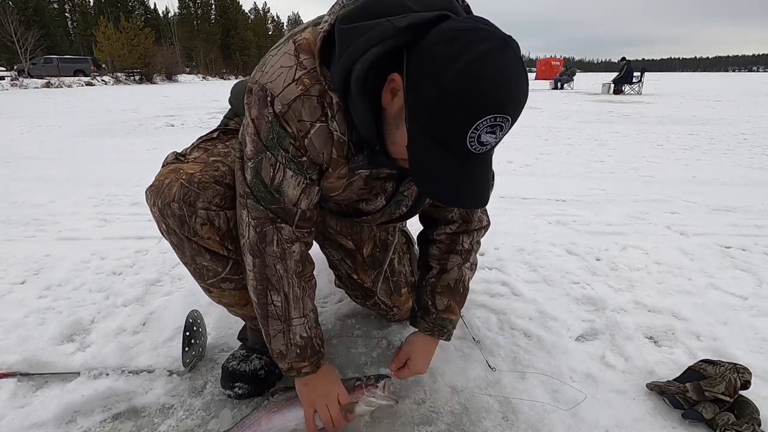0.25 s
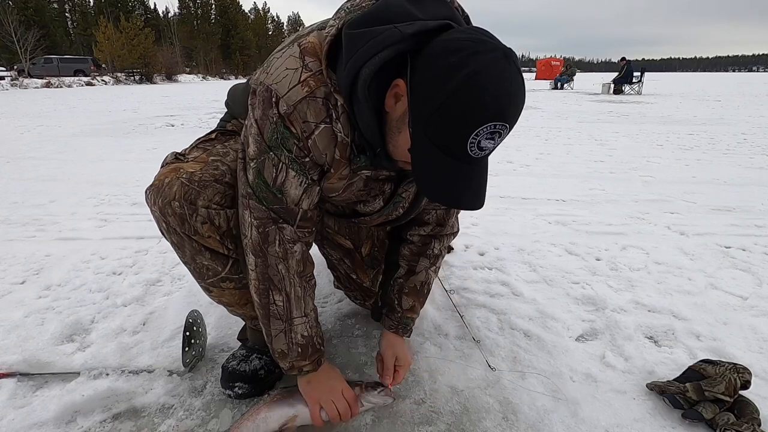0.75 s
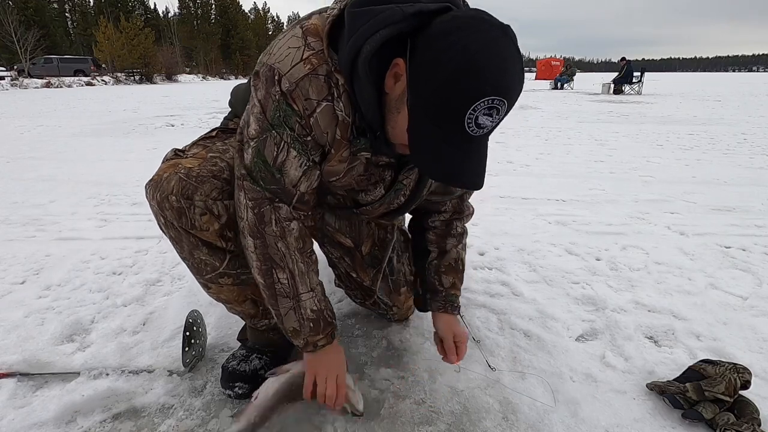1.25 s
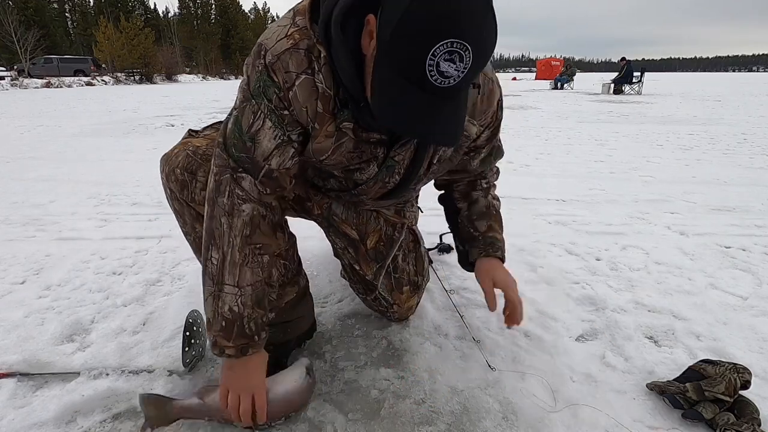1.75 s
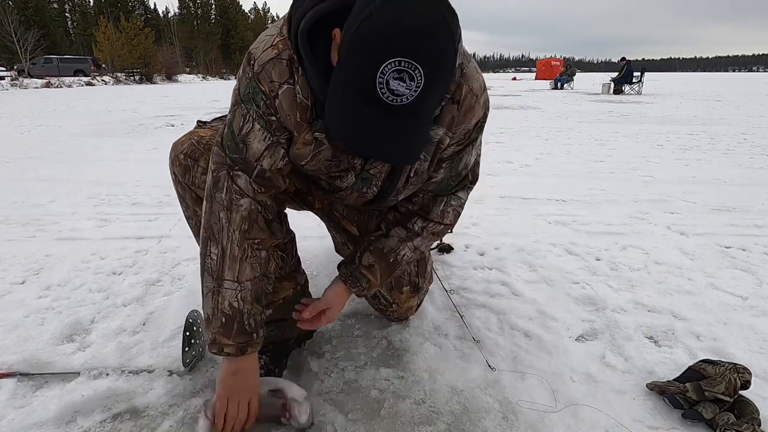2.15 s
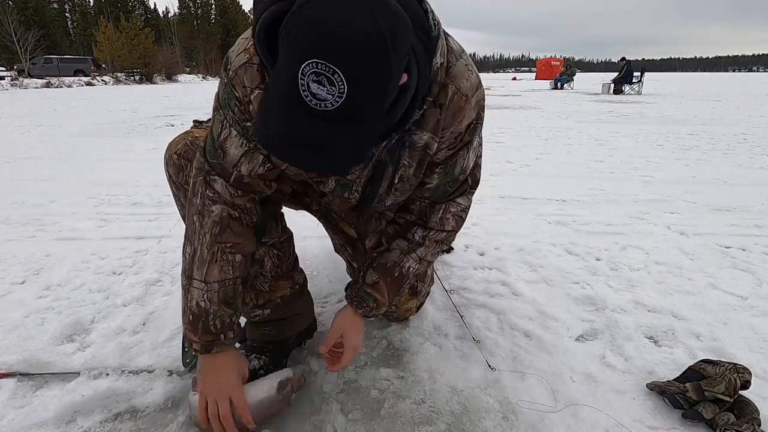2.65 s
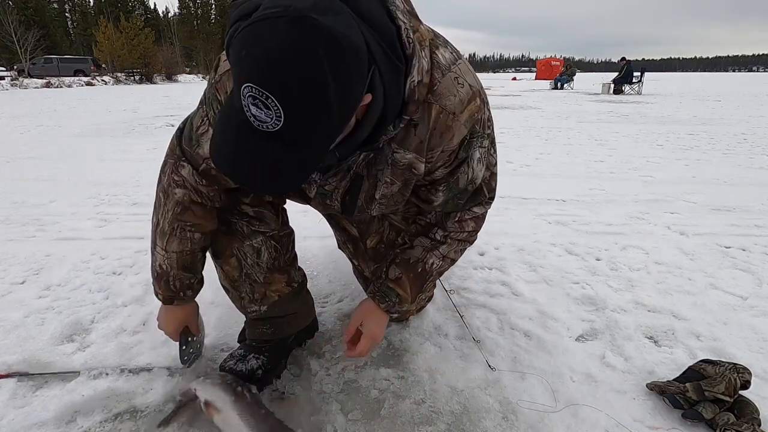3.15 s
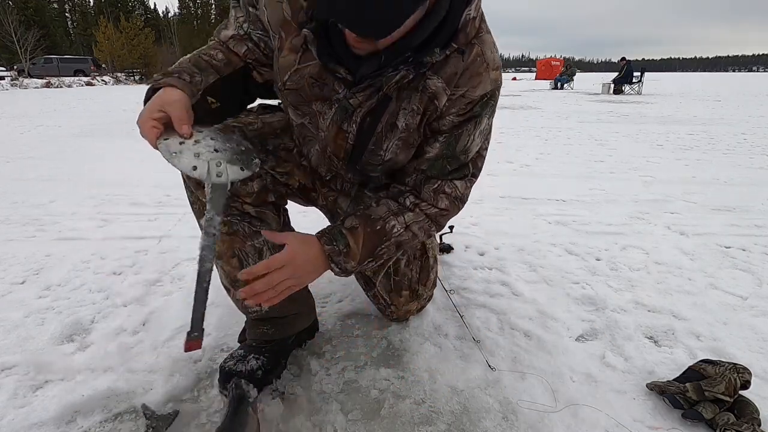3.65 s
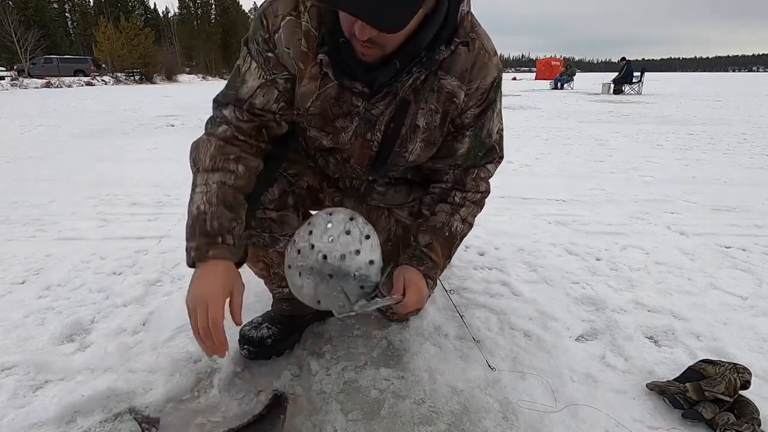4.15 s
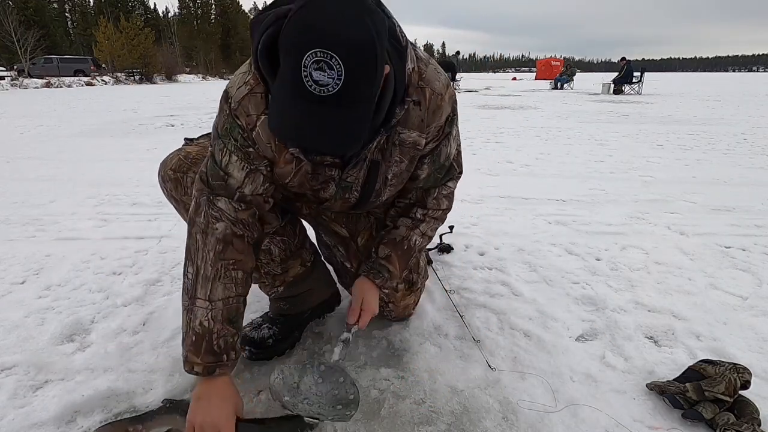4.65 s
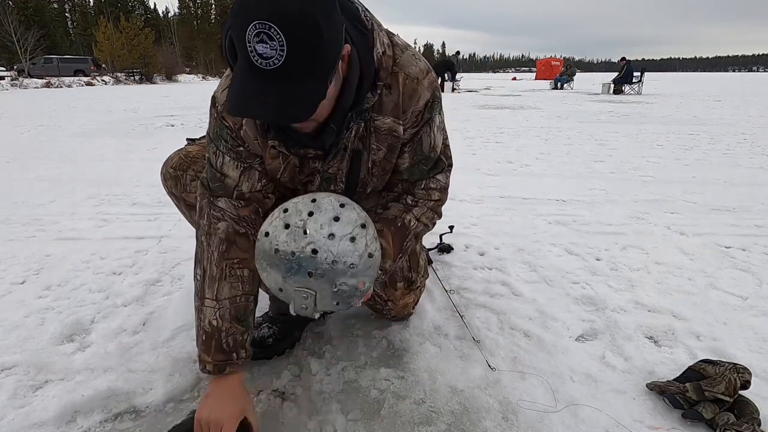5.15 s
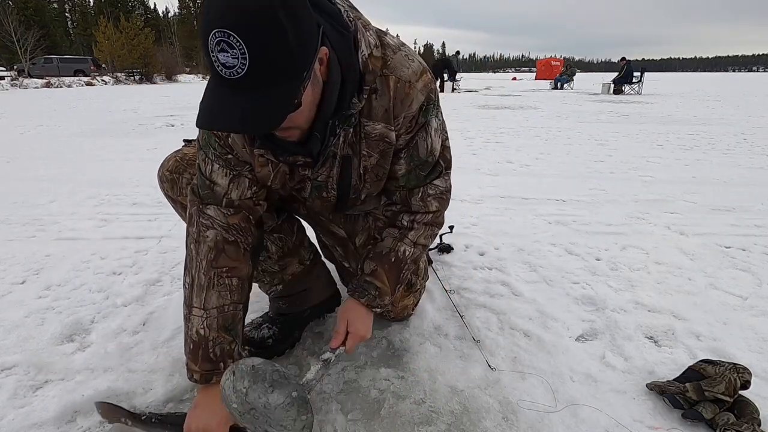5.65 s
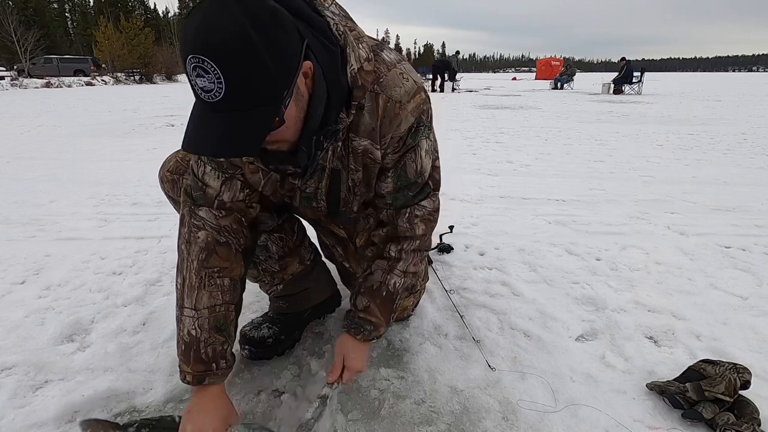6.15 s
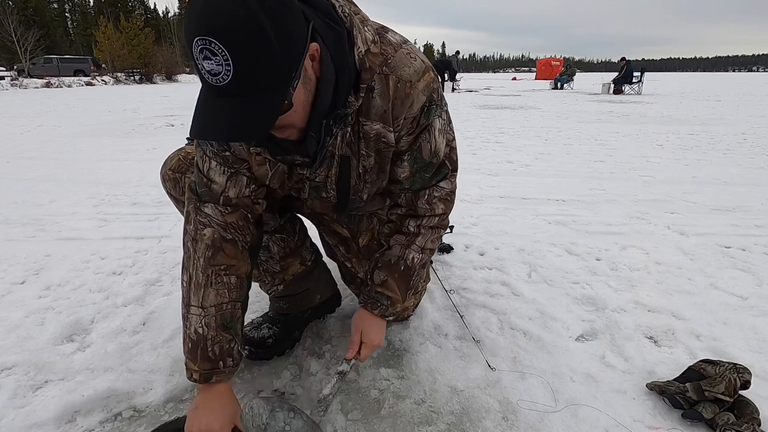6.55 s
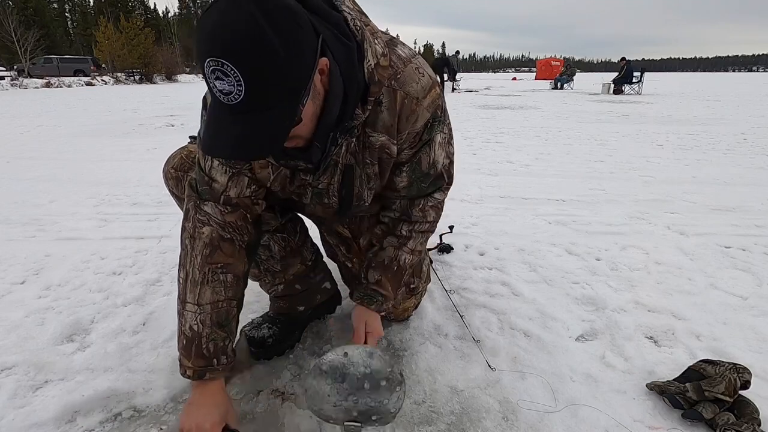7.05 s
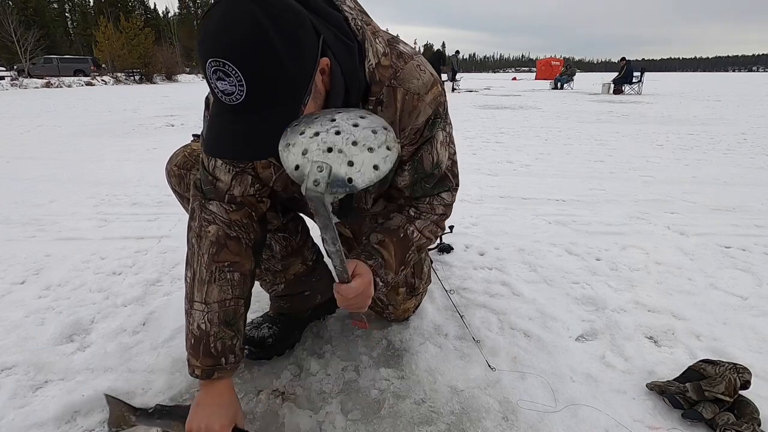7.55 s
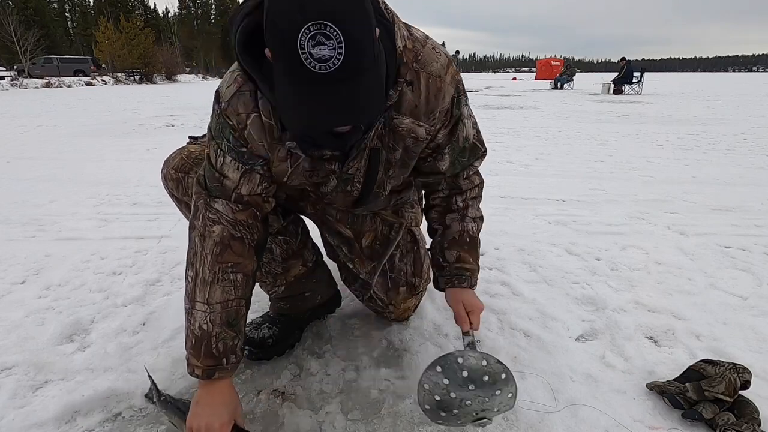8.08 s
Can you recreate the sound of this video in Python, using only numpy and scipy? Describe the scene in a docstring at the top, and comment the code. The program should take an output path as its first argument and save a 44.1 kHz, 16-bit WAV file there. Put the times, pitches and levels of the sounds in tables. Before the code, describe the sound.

Ice fishing heard from very near: cloth rustles, wet snow crunches, air pockets pop and crumbs of ice crack irregularly. After about six seconds of sliding and scuffing, a perforated metal scoop strikes slush three times, its dull clank dying almost at once, with crackle, thump and stirring between blows. Outdoors, no echo beyond a slap off the ice, and only faint air behind.

```python
"""Ice fishing, heard close up: a fish, hands and stiff sleeves slide over wet, grainy snow as shaped grain noise,
while air pockets pop as short rings, crumbs of ice snap as filtered bursts and soft thuds push as damped sines.
Then a perforated metal skimmer scrapes the slush and chops into it three times, each a damped modal ring that
the ice returns, with cracks and spray, led in by a soft rush of air and followed by churning slush.
Faint air of the open lake, a coloured noise, lies under it throughout."""
import sys
import numpy as np
from scipy import signal
from scipy.fft import rfft, irfft, next_fast_len
from scipy.io import wavfile
from scipy.ndimage import uniform_filter1d, map_coordinates

SR = 44100
rng = np.random.default_rng(int(sys.argv[2]) if len(sys.argv) > 2 else 0)


def wav_out(sig):
    """Save sig, one row per channel (or a flat mono array), as 16-bit PCM at SR to the path in sys.argv[1]."""
    wavfile.write(sys.argv[1], SR, np.round(np.clip(np.atleast_2d(sig).T, -1, 1) * 32767).astype(np.int16))


N = 366912  # length in samples

# long strokes: drags over snow, a pull through slush, sleeves rustling as the skimmer lifts and swings:
# start_s, length_s, rasp_db, swell_db (start to end), hiss_db (relative to the rasp)
STROKES = [(0.114, 0.12, -43, 6.5, -6.5), (1.283, 0.43, -39.5, -8.5, -2.5), (1.746, 0.17, -63, -11, 10.5),
           (1.898, 0.17, -46.5, 3.5, -4), (2.251, 0.11, -35.5, -2.5, -1.5), (2.38, 0.17, -42.5, 2.5, 0),
           (2.544, 0.21, -44, -2, -1.5), (2.837, 0.16, -55, 4.5, 4.5), (2.63, 0.09, -33.5, 2, -3),
           (2.924, 0.23, -43.5, -1.5, -1), (3.184, 0.29, -40, -5, -3.5), (3.524, 0.048, -44, 13, 0),
           (4.56, 0.54, -47, -5.5, -1.5), (4.885, 0.2, -37.5, 1.5, -3), (5.083, 0.097, -40.5, -7.5, -3.5),
           (5.28, 0.255, -52.5, 7, -2), (5.552, 0.14, -61.5, 8.5, 1.5), (6.453, 0.15, -38.5, -5, 0),
           (6.798, .2, -47, 0.5, -3.5), (7.357, 0.13, -51, 5.5, -0.5), (7.621, 0.17, -47.5, -0.5, -4)]
STROKE_ATTACK_S, STROKE_T60_S, STROKE_CRUMBS = 0.035, 0.15, .33  # crumbs: share 0-1
# quick scuffs: start_s, rasp_db, hiss_db (relative to the rasp)
SCUFFS = [(0.647, -43, -6.5), (0.804, -30.5, -8), (1.32, -38, -5), (1.436, -37, 1), (2.188, -45, -16),
          (2.757, -37.5, -6.5), (3.208, -33, -6.5), (3.308, -37, -13), (3.557, -32.5, -5.5),
          (3.66, -43.5, -3.5), (3.911, -37.5, 1.5), (3.984, -45.5, -0.5), (4.725, -41, -3), (5.76, -77, 18),
          (6.643, -51.5, 2.5), (6.895, -46.5, -0.5), (7.375, -49, 2.5)]
SCUFF_ATTACK_S, SCUFF_LENGTH_S, SCUFF_T60_S, SCUFF_CRUMBS = 0.019, 0.029, 0.12, 0.32
# wet handling: fingers on the fish, then slush pressed or stirred:
# start_s, length_s, rasp_db, swell_db, hiss_db (relative to the rasp), crumbs (share 0-1), gurgle_db
WET_HANDLING = [(0.39, 0.23, -60.5, 4, -10, 1, -96), (0.94, 0.17, -53, -4, -5, 0.8, -99),
                (1.143, 0.065, -30.5, 0, -9, 0.25, -64), (1.193, 0.062, -32, -3, -6, 0, -49.5),
                (4.054, 0.073, -39.5, 24.5, -15, 0.67, -52.5), (4.125, 0.062, -26.8, 3, -12, 0.12, -42),
                (4.836, 0.044, -38.5, 11, -4.5, .2, -54), (6.291, 0.047, -35.5, -3, -6.5, 0.7, -44),
                (6.346, 0.06, -39.5, 1, -1.5, 0.66, -42.5), (6.4, 0.04, -41, -5, -1.5, 0.5, -39.5),
                (7.064, 0.18, -49, 6, -2.5, 0.8, -53.5)]
WET_ATTACK_S, WET_T60_S = 0.023, 0.15
# stiff clothing never quite stops rustling: time_s, rasp_db
RUSTLE = [(0, -53.5), (.28, -50), (.36, -68.5), (.58, -66), (.64, -60), (.87, -48.5), (.905, -60),
          (1.3, -52), (2.17, -53.5), (3.6, -47), (3.88, -56), (4.26, -51), (4.42, -57), (5.66, -55),
          (5.73, -72), (5.84, -60.5), (6.06, -75), (6.3, -58)]
RUSTLE_HISS_DB, RUSTLE_CRUMBS = -4.5, 0.53  # hiss relative to the rasp at the usual level; share 0-1
RUSTLE_USUAL_DB, RUSTLE_BRIGHTENS = -51.5, 0.37  # usual level; dB more hiss for each dB above it
# weave of a moving sleeve: level relative to the rasp, pitch at full force, noise width, rise with force
ZIP_DB, ZIP_HZ, ZIP_WIDTH_HZ, ZIP_HZ_PER_DB = -10, 2850, 480, 25

# skimmer blows: start_s, clack_db, repeat_db (reflection off the ice, relative to the clack),
# thump_db, thump_hz, spray_db, crack_db, focus_hz (strongest ring)
CHOPS = [(6.2130, -10.5, -9.5, -14.5, 131, -28, -20, 1060), (7.014, -12, -1, -24, 180, -27, -21, 1520),
         (7.7684, -10, -10, -15, 177, -53, -22, 1550)]
REFLECTION_LAG_S = .0042  # direct ring to reflection
# ring modes of the scoop, damped by slush: pitch_hz, level_db, t60_s
SCOOP_MODES = [(390, -14.5, 0.055), (690, -7, 0.022), (963, 3, 0.013), (1260, -1.5, .025),
               (1480, 10, 0.0069), (1923, 0.2, 0.019), (2262, -2.5, 0.03), (3140, -11, .018),
               (3960, -2, 0.011)]
STIR_DB, STIR_GURGLE_DB, STIR_T60_S = -59.5, -56.5, 0.3  # slush settling after each blow: rasp, gurgle, decay
CRACKLE_DB, CRACKLE_HZ = -3, 1700  # fine wet crackle, relative to the crumbs of wet handling

# snapping crumbs and small taps: start_s, level_db, pitch_hz
SNAPS = [(0.718, -23, 1720), (0.723, -17, 1900), (0.918, -26, 3500), (1.643, -22.5, 3500),
         (2.2722, -14.5, 2340), (2.351, -16, 3040), (3.286, -19, 1600), (4.138, -14, 2000),
         (4.158, -14, 2400), (4.32, -29, 7650), (5.3582, -22, 3710), (6.3127, -16, 1690),
         (6.329, -19, 2200), (6.4726, -14, 4700)]
# small patches of snow crust that give way: middle_s, level_db, pitch_hz
CRUNCHES = [(0.385, -49, 4570), (2.11, -42, 2600), (2.791, -32, 3600), (3.764, -36.5, 2920),
            (3.841, -45, 3200), (5.3, -47, 3500), (6.733, -51, 3500), (7.313, -39.5, 3000),
            (8.1, -47, 3000)]
CRUNCH_WIDTH_S = .006  # from the middle of the swell to 1/e
# wet pops of bursting air pockets: start_s, level_db, pitch_hz
BLIPS = [(0.4, -37, 1150), (0.518, -30, 1150), (0.531, -38, 1100), (0.62, -36, 1250), (0.949, -30, 1600),
         (0.978, -30, 1530), (1.002, -30, 1500), (1.017, -33, 1450), (1.077, -35, 1700), (1.091, -33, 1690),
         (1.141, -30, 1380), (6.355, -22, 1500), (7.106, -33, 1350), (7.121, -30, 1720), (7.144, -31, 1200),
         (7.166, -32, 1500), (7.185, -28.5, 1450), (7.2, -35, 1550)]
# soft thuds on packed snow and slush: start_s, push_db, pitch_hz, knock_db
THUDS = [(1.573, -31, 160, -35.5), (1.645, -41, 139, -33), (2.788, -41, 151, -46), (3.065, -56, 151, -69),
         (3.838, -46.5, 251, -72), (4.074, -37, 140, -55), (4.228, -43, 94, -41), (6.314, -32, 258, -50),
         (6.353, -33, 290, -36), (6.414, -32.5, 188, -35.5), (6.489, -38, 250, -54),
         (7.105, -37.5, 264, -60), (7.239, -36.5, 192, -70)]
KNOCK_HZ = 472  # the hard crust under the snow answers each thud
SWING_DB, SWING_RISE_DB_PER_S = -52.5, 178  # rush of air at the moment of landing, and its climb

# tone of dragged snow, relative: pitch_hz, level_db (per Hz)
RASP_SPECTRUM = [(40, -50.5), (160, -23), (400, -14), (780, -14), (1200, -4.5), (1900, -1), (2900, 0),
                 (4200, -2.5), (6000, -13.5), (15000, -43)]
# tone of fine wet grains, relative: pitch_hz, level_db (per Hz)
HISS_SPECTRUM = [(1000, -45.5), (2500, -3.5), (4300, 2), (5400, 1), (6500, -3), (7700, -1), (8600, -4),
                 (12500, -12), (14000, -17), (15500, -55.5)]
# tone of coarse breaking crumbs, relative: pitch_hz, level_db (per Hz)
CRUMB_SPECTRUM = [(100, -48), (800, -16.5), (1100, -1.5), (1400, 0), (2900, 5), (4300, -4), (8000, -17.5),
                  (14000, -31)]
# tone of gurgling slush, relative: pitch_hz, level_db (per Hz)
CHURN_SPECTRUM = [(20, -19), (55, -3), (85, -9), (160, 4.5), (280, 0), (420, 0), (650, -7), (1200, -5),
                  (4000, -44)]
# tone of cracking crust and spray, relative: pitch_hz, level_db (per Hz)
CRACK_SPECTRUM = [(100, -2), (500, -18.5), (1000, -8), (2000, -1.5), (4000, -1), (10000, -17),
                  (15000, -27.5)]
# tone of the open air, relative: pitch_hz, level_db (per Hz)
AIR_SPECTRUM = [(20, -11.5), (105, -11), (155, 6), (300, -1.5), (700, -3), (1200, -2.5), (8000, -14),
                (15000, -30)]

# stereo width, as gain on the side signal: pitch_hz, side_db
WIDTH = [(100, -12), (600, -10), (1200, -14.5), (2000, -25.5), (3600, -16), (5000, -9.5), (7300, -5.5),
         (11000, -9)]
# balance between the ears: pitch_hz, left_minus_right_db
LEAN = [(1000, -1.9), (1800, -1), (3900, 0.6), (7300, -7), (9500, -1)]
# phase between the microphones: pitch_hz, left_lead_rad
PORT_PHASE = [(4000, -0.022), (6300, -0.6), (7500, 0.18), (8600, 1), (10000, -0.6)]
HOLE_LAG_S = .00002  # sounds from the hole reach the left microphone this much later
TOP_HZ = 15000


def sliding():
    """Countless snow grains rasp and hiss; coarser crumbs break in clumps among them."""
    rasp_db, hiss_db, share = friction()
    catch_db = 0.19 * wobble(42) + wobble(220)  # the surface catches and lets go
    breaks = clumps(rate=69, decay_s=0.015)
    coarse = grains(rate=4500, top_hz=13600, t60=0.0026, spread_db=0)
    crumbs = coloured(coarse * breaks, CRUMB_SPECTRUM)
    rasp = np.sqrt(1 - share) * coloured(noise(), RASP_SPECTRUM) + np.sqrt(share) * crumbs
    rasp = patchy(rasp, depth_db=2.3)
    # heavy, wet dragging has little hiss and a deeper crunch
    deep = filtered(rasp, lambda hz: 1 / (1 + (hz / 2000) ** 4))
    rasp = rasp + deep * (amp(-.4 * (hiss_db + 4)) - 1)
    fine = grains(rate=5000, top_hz=13600, t60=0.0048, spread_db=1)
    hiss = coloured(noise() + np.sqrt(share) * breaks * fine, HISS_SPECTRUM)
    hiss = patchy(hiss, depth_db=1.8)
    return amp(rasp_db + catch_db - 1.5) * rasp + amp(rasp_db + hiss_db + catch_db + 0.73) * hiss


def friction():
    """All movements add their power; gives rasp dB, hiss dB relative to it, and the share of crumbs."""
    rustle_db, = curves(RUSTLE)
    power = friction_power(0, RUSTLE_HISS_DB, RUSTLE_CRUMBS) * amp(rustle_db) ** 2
    power[1] *= amp(RUSTLE_BRIGHTENS * (rustle_db - RUSTLE_USUAL_DB)) ** 2
    for s, length_s, db, swell_db, hiss_db in STROKES:
        shape = stroke(length_s, STROKE_ATTACK_S, STROKE_T60_S, swell_db)
        add(power, s, friction_power(db, hiss_db, STROKE_CRUMBS) * shape)
    for s, db, hiss_db in SCUFFS:
        shape = stroke(SCUFF_LENGTH_S, SCUFF_ATTACK_S, SCUFF_T60_S)
        add(power, s, friction_power(db, hiss_db, SCUFF_CRUMBS) * shape)
    for s, length_s, db, swell_db, hiss_db, crumbs, _ in WET_HANDLING:
        shape = stroke(length_s, WET_ATTACK_S, WET_T60_S, swell_db)
        add(power, s, friction_power(db, hiss_db, crumbs) * shape)
    for s, *_ in CHOPS:
        shape = stroke(0.12, WET_ATTACK_S, STIR_T60_S)
        add(power, s, friction_power(STIR_DB, hiss_db=0, crumbs=0.79) * shape)
    rasp, hiss, crumbs = power
    return 10 * np.log10(rasp), 10 * np.log10(hiss / rasp), np.clip(crumbs / rasp, 0, 1)


def friction_power(db, hiss_db, crumbs):
    """Power rows of one movement: rasp, hiss, crumbs."""
    return amp(db) ** 2 * np.array([[1], [amp(hiss_db) ** 2], [np.clip(crumbs, 0, 1)]])


def stroke(length_s, attack_s, t60, swell_db=0):
    """Power over one movement: it gathers speed, presses harder or eases off, then comes to rest."""
    t = np.arange(int((length_s + t60) * SR)) / SR
    pressure = amp(swell_db * (np.minimum(t / length_s, 1) - .5))
    rest = fade(np.maximum(t - length_s, 0), t60)
    return (np.minimum(t / attack_s, 1) * pressure * rest) ** 2


def zipping():
    """The weave of a moving sleeve hisses in a narrow band that climbs as the stroke gets harder."""
    power = np.zeros((1, N))
    for s, length_s, db, swell_db, _ in STROKES:
        add(power, s, amp(db) ** 2 * stroke(length_s, STROKE_ATTACK_S, STROKE_T60_S, swell_db))
    force_db = 10 * np.log10(power[0] / power.max() + 1e-6)
    pitch_hz = ZIP_HZ + ZIP_HZ_PER_DB * force_db + ZIP_WIDTH_HZ / 2 * wobble(20)
    weave = filtered(noise(), lambda hz: 1 / (1 + (hz / ZIP_WIDTH_HZ) ** 2))
    carrier = np.cos(2 * np.pi * np.cumsum(pitch_hz) / SR)
    return amp(ZIP_DB) * np.sqrt(power) * unit(weave * carrier)


def chops():
    """The skimmer rings and cracks the crust; the ice returns each ring about 4 ms later; slush thumps and sprays."""
    out, t = np.zeros((2, N)), np.arange(SR // 5) / SR
    for s, clack_db, repeat_db, thump_db, thump_hz, spray_db, crack_db, focus_hz in CHOPS:
        ring = scoop(t, focus_hz) + amp(repeat_db) * scoop(t - REFLECTION_LAG_S, focus_hz)
        crack_shape = np.minimum(t / .001, 1) * fade(np.maximum(t - REFLECTION_LAG_S, 0), .027)
        crack = coloured(noise(len(t)), CRACK_SPECTRUM) * crack_shape
        spray = coloured(noise(len(t)), CRACK_SPECTRUM) * fade(t - .007, 0.19)
        push = thump(t - .0055, thump_hz, cycles=3.2) + 0.67 * thump(t - .0055, 1.8 * thump_hz, cycles=4.2)
        slosh = 0.065 * coloured(noise(len(t)), CHURN_SPECTRUM) * fade(t - .003, 0.19)
        add(out, s, ahead(amp(clack_db) * ring))
        add(out, s, amp(crack_db) * crack)
        add(out, s, amp(thump_db) * (ahead(push) + slosh))
        add(out, s, amp(spray_db) * spray)
        # the scoop touches loose slush just before it lands
        touch = unit(filtered(noise(len(t)), lambda hz: band(880)(hz) ** 2)) * fade(t, 0.05)
        add(out, s - .0105, amp(clack_db - 24) * touch)
    return out


def scoop(t, focus_hz):
    """The contact point favours modes near focus_hz; slush chokes the ring in a few hundredths of a second."""
    ring = 0
    for k, (hz, db, t60) in enumerate(SCOOP_MODES):
        favour_db = 6 * np.exp(-(np.log(hz / focus_hz) / 0.125) ** 2)
        mode = np.sin(2 * np.pi * hz * t) * fade(t, t60)
        ring = ring + (-1) ** k * amp(db + favour_db) * mode
    return ring * (1 - np.exp(-np.maximum(t, 0) / .0016))  # soft onset


def churning():
    """Air pockets gurgle and wet grains tumble, lump by lump, in wet handling and in slush just struck."""
    power = np.zeros((1, N))
    for s, length_s, *_, gurgle_db in WET_HANDLING:
        add(power, s, amp(gurgle_db) ** 2 * stroke(length_s, WET_ATTACK_S, WET_T60_S))
    for s, *_ in CHOPS:
        add(power, s, amp(STIR_GURGLE_DB) ** 2 * stroke(.018, WET_ATTACK_S, STIR_T60_S))
    lumps = clumps(rate=260, decay_s=0.007)
    bubbles = grains(rate=880, top_hz=1870, t60=0.02, spread_db=0)
    pockets = coloured((bubbles + 1.6 * noise()) * lumps, CHURN_SPECTRUM)
    return np.sqrt(power) * pockets * [[1], [.4]]  # mid, side


def crackling():
    """Tiny wet pops burst one after another while fingers handle the fish or slush is pressed or stirred."""
    power = np.zeros((1, N))
    for s, length_s, db, _, _, crumbs, _ in WET_HANDLING:
        shape = stroke(length_s, WET_ATTACK_S, WET_T60_S)
        add(power, s, np.clip(crumbs, 0, 1) * amp(db) ** 2 * shape)
    pops = grains(rate=300, top_hz=4200, t60=.005, spread_db=6)
    return amp(CRACKLE_DB) * np.sqrt(power) * unit(filtered(pops, band(CRACKLE_HZ)))


def snaps():
    """Each crumb cracks, with a smaller crack just after, around its own pitch."""
    out, t = np.zeros((2, N)), np.arange(SR // 20) / SR
    for s, db, pitch_hz in SNAPS:
        shape = fade(t, .018) + .5 * fade(t - rng.uniform(.003, .007), .015)
        add(out, s, amp(db - 12) * shape * unit(filtered(noise(len(t)), band(pitch_hz))))
    return thin(out)


def crunches():
    """A patch of crust crumbles in a quick run of tiny cracks that swells and fades."""
    out, t = np.zeros((2, N)), np.arange(-SR // 40, SR // 40) / SR
    for s, db, pitch_hz in CRUNCHES:
        cracks = noise(len(t)) * (rng.random(len(t)) < 3000 / SR)  # about 3000 a second
        swell = np.exp(-(t / CRUNCH_WIDTH_S) ** 2)
        add(out, s + t[0], amp(db) * swell * unit(filtered(cracks, band(pitch_hz))))
    return out


def blips():
    """A small pocket bursts with a tick and rings for a few cycles; fainter neighbours follow at uneven gaps."""
    out, t = np.zeros((2, N)), np.arange(SR // 25) / SR
    for s, db, pitch_hz in BLIPS:
        for k in range(4):
            hz = pitch_hz * np.exp(rng.normal(.15, .2) * k)  # neighbours tend to ring higher
            ring = np.sin(2 * np.pi * hz * t) * fade(t, .012) * (1 - np.exp(-t / .0008))
            tick = amp(-17) * unit(filtered(noise(len(t)), band(2 * hz))) * fade(t, .009)
            lag_s = .0017 * k * rng.uniform(.5, 1.5)
            add(out, s + lag_s, amp(db - 3.5 * k) * (ahead(ring) + tick))
    return thin(out)


def thuds():
    """Weight lands on packed snow: a short knock of the crust, a dull pat and a push."""
    out, t = np.zeros((2, N)), np.arange(SR // 10) / SR
    for s, db, pitch_hz, knock_db in THUDS:
        push = thump(t - .0015, pitch_hz, cycles=4.2)
        knock = thump(t, KNOCK_HZ, cycles=4.9)
        pat = amp(-12) * unit(filtered(noise(len(t)), band(900))) * fade(t, 0.025)
        add(out, s, ahead(amp(db) * push) + amp(knock_db) * (ahead(knock) + pat))
    return out


def thump(t, pitch_hz, cycles):
    """A low push that swells and dies within a few cycles."""
    age = np.maximum(t, 0)
    swell = 1 - np.exp(-2 * age * pitch_hz)
    dent = np.sin(2 * np.pi * pitch_hz * age) * fade(age, cycles / pitch_hz) * swell
    push = np.gradient(dent)  # the air follows the speed of the yielding surface
    return push / np.abs(push).max()


def swings():
    """A soft, dull rush of air, brushed aside by the skimmer, grows until it lands."""
    out, t = np.zeros((2, N)), np.arange(-SR // 5, 0) / SR
    for s, *_ in CHOPS:
        rush = coloured(noise(len(t)), [(50, -15.5), (200, -10.5), (1000, -2.5), (4000, -17)])
        add(out, s + t[0], amp(SWING_DB + SWING_RISE_DB_PER_S * t) * rush)
    return out


def open_air():
    """The faint, steady air of the lake is coloured noise."""
    return amp(-68) * coloured(noise(), AIR_SPECTRUM)


def grains(rate, top_hz, t60, spread_db):
    """Tiny damped rings at random times, pitches, sizes and directions; mid and side rows."""
    when, pitch, size, side = rng.random((int(rate * N / SR), 4)).T[:, :, None]
    k = np.arange(int(t60 * SR / 2))  # the faint second half of each ring is left out
    level = amp(-spread_db * np.log(size + 0.085))
    rings = level * np.sin(2 * np.pi * top_hz * pitch * k / SR) * fade(k / SR, t60)
    at = ((when * N).astype(int) + k).ravel()
    rows = [np.bincount(at, (rings * gain).ravel(), N)[:N] for gain in (1, 2 * side - 1)]
    return np.array([unit(row) for row in rows])


def clumps(rate, decay_s):
    """Crumbs give way in little avalanches that start at once and die away; rms 1."""
    starts = (rng.random(N) < rate / SR) * rng.uniform(0.4, 1, N)
    return unit(0.24 + signal.lfilter([1], [1, -np.exp(-1 / (decay_s * SR))], starts))


def patchy(x, depth_db):
    """The colour of x shifts in small patches of time and frequency; rms 1."""
    z = signal.stft(x, nperseg=512)[2]
    field = uniform_filter1d(rng.standard_normal(z.shape[1:]), size=5, axis=0)
    field = uniform_filter1d(field, size=7, axis=1)
    return unit(signal.istft(z * amp(depth_db * unit(field)), nperseg=512)[1][:, :N])


def band(pitch_hz):
    """The response of a small broken piece: a broad hump around its pitch."""
    def response(hz):
        detune = hz / pitch_hz - pitch_hz / (hz + 1)
        return (1 + (1.2 * detune) ** 2) ** -.75 / (1 + (hz / 13000) ** 8)
    return response


def thin(x):
    """Small pieces radiate almost no bass."""
    return filtered(x, lambda hz: 1 - 1 / (1 + (hz / 900) ** 6))


def amp(db):
    """Decibels to gain."""
    return 10 ** (np.asarray(db) / 20)


def unit(x):
    """x at rms 1."""
    return x / np.sqrt(np.mean(x ** 2) + 1e-20)


def along(points, hz):
    """(Hz, value) points read on a log axis."""
    f, v = np.transpose(points)
    return np.interp(np.log(hz + 1), np.log(f + 1), v)


def curves(rows):
    """One value per sample for each column after the time."""
    s, *cols = np.transpose(rows)
    return [np.interp(np.arange(N) / SR, s, c) for c in cols]


def wobble(rate):
    """A smooth random curve, rate knots a second."""
    return map_coordinates(rng.standard_normal(int(N * rate / SR) + 4), [np.arange(N) * rate / SR])


def filtered(x, response):
    """x times a response of frequency."""
    n = x.shape[-1]
    m = next_fast_len(n + 8192)
    return irfft(rfft(x, m) * response(np.fft.rfftfreq(m, 1 / SR)), m)[..., :n]


def coloured(x, spectrum):
    """x shaped by the given spectrum, at rms 1."""
    return unit(filtered(x, lambda hz: amp(along(spectrum, hz))))


def noise(size=N):
    """White noise in a mid and a side row."""
    return rng.standard_normal((2, size))


def fade(t, t60):
    """A decay that starts at t = 0 and loses 60 dB in t60 seconds."""
    return (t >= 0) * 1000. ** (-np.abs(t) / t60)


def add(track, s, sound):
    """Mix a sound in at time s."""
    part = track[:, round(s * SR):][:, :sound.shape[-1]]
    part += sound[..., :part.shape[1]]


def ahead(x):
    """A sound from straight ahead: mid only."""
    return np.array([x, 0 * x])


def scene():
    """Layers meet in mid and side, then left and right differ in level and phase, most in the treble."""
    hole = chops() + churning() + crackling()
    snow = sliding() + zipping() + snaps() + crunches() + blips() + thuds()
    mid, side = hole + snow + swings() + open_air()
    side = filtered(side, lambda hz: amp(along(WIDTH, hz)))
    side = side - HOLE_LAG_S / 2 * SR * np.gradient(hole[0])  # a slope in the side delays the left
    half = np.array([[.5], [-.5]])  # left and right share each difference

    def ports(hz):
        return amp(half * along(LEAN, hz)) * np.exp(1j * half * along(PORT_PHASE, hz))
    return filtered(np.array([mid + side, mid - side]), ports)


def record(dry):
    """Nothing at or above the band limit passes."""
    return filtered(dry, lambda hz: hz < TOP_HZ)


dry = scene()
out = record(dry)
wav_out(out)
```